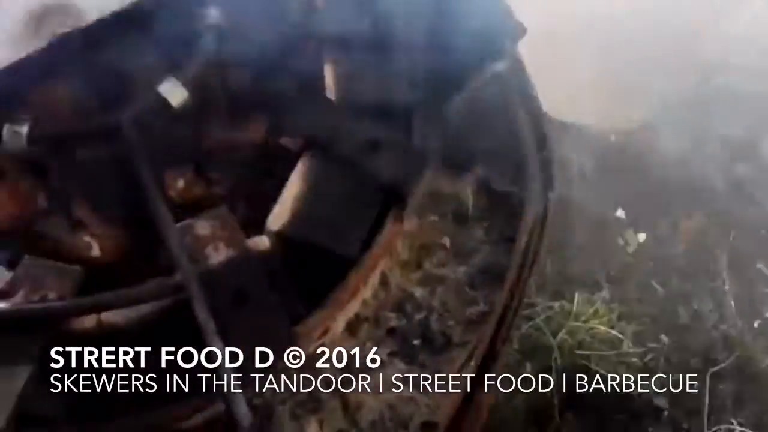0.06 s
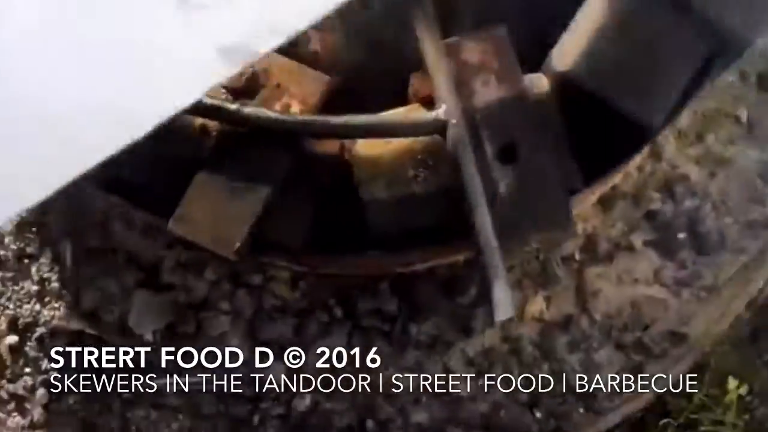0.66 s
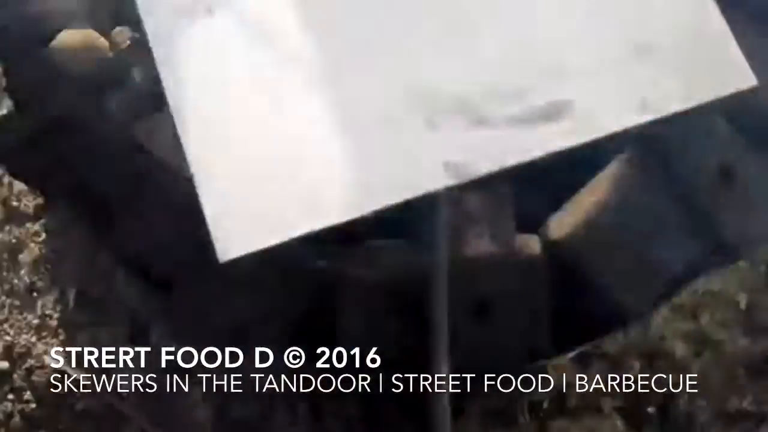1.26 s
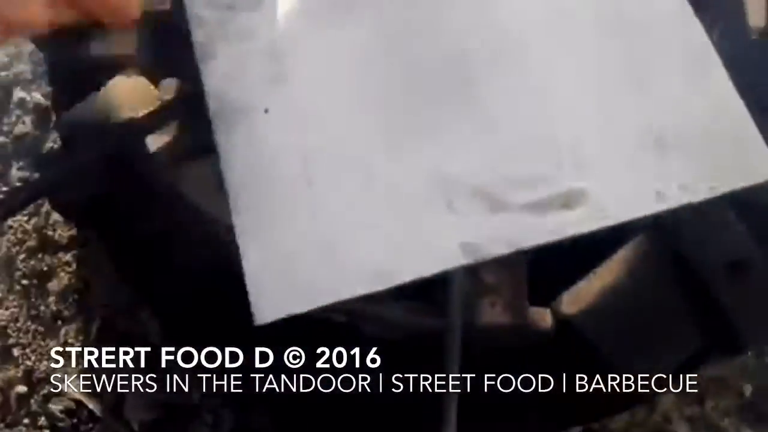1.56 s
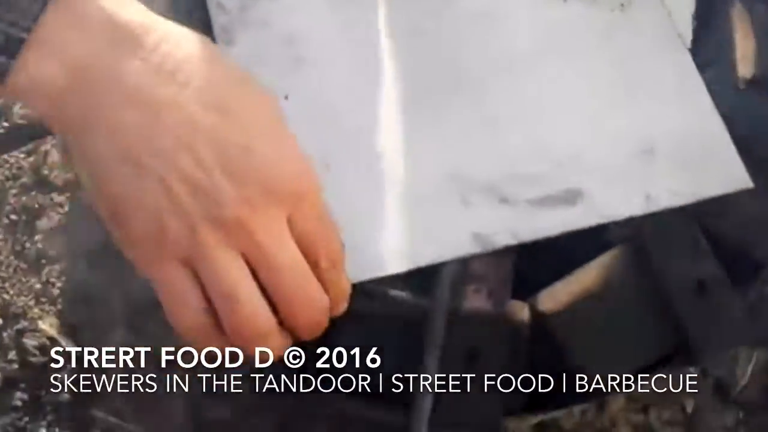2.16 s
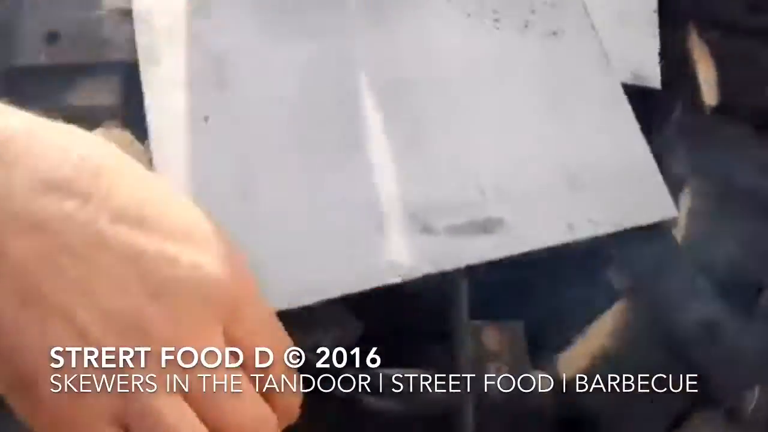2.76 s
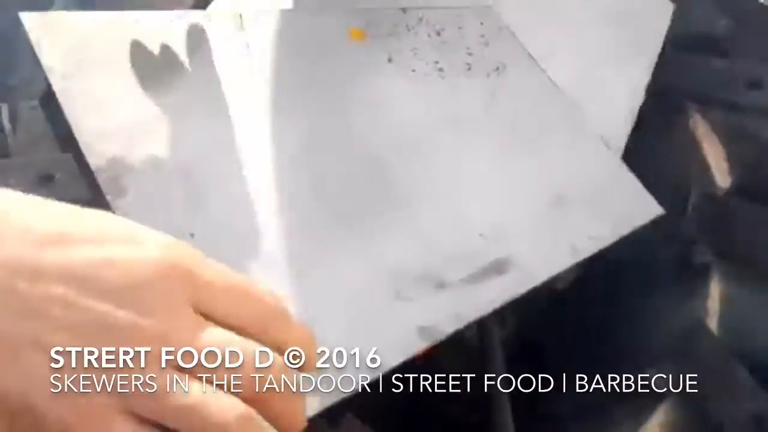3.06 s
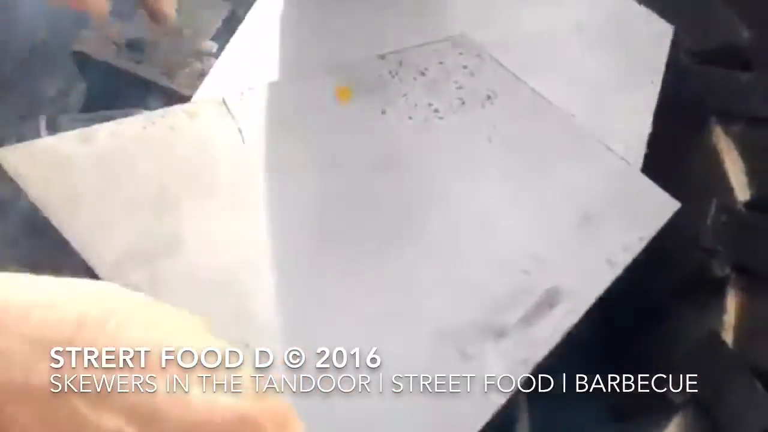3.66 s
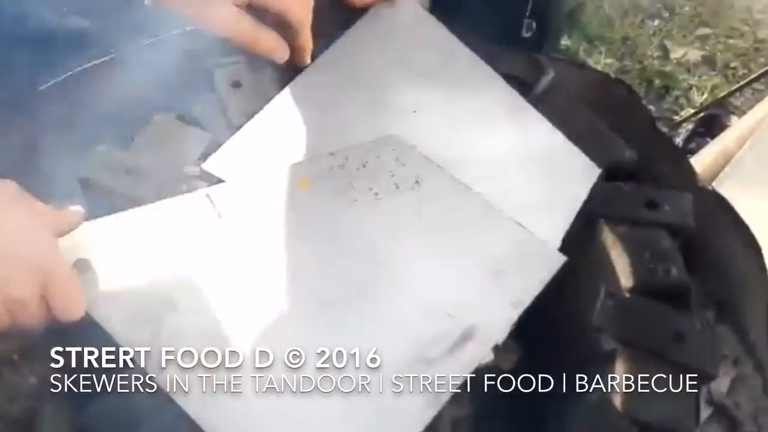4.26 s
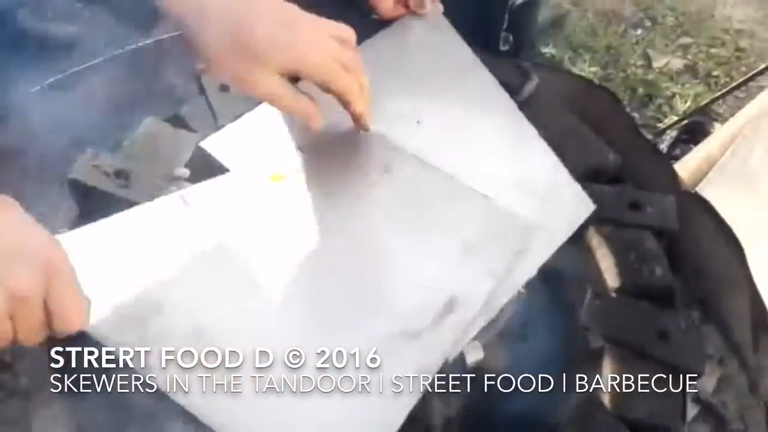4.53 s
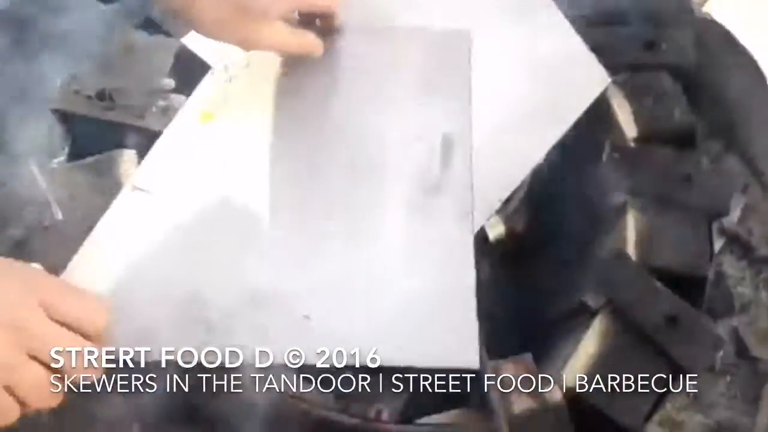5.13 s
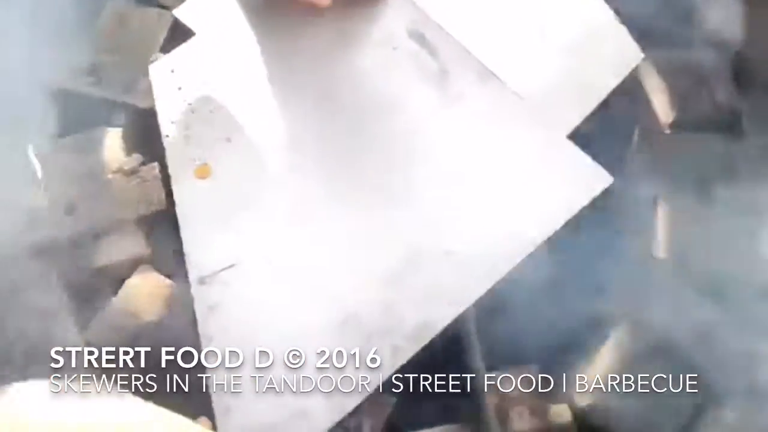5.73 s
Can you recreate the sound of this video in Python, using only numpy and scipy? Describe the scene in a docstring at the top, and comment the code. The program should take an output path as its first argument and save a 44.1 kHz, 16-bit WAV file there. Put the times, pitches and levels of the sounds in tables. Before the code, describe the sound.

Wind rumbles and buffets a nearby microphone outdoors while someone handles thin metal sheets. Sharp, high clinks and short scratches lead to a single bright crash with a brief rattle as a sheet lands on the stack. Then metal slides over metal in irregular, gritty, slightly ringing scrapes, strongest around the middle, before thinning to soft rubs and light taps under the gusts.

```python
"""At an outdoor oven, thin metal sheets are laid over the mouth and pushed into place.
They clink and crash down once: each impact excites dense bending modes, which decay exponentially.
Sliding over each other they scrape, as stick-slip friction drives the same kind of modes.
Turbulent wind rumbles, buffets and thumps on the microphone, which overloads on the crash."""
import sys
import numpy as np
from scipy import signal
from scipy.fft import rfft, irfft, next_fast_len
from scipy.io import wavfile
from scipy.ndimage import uniform_filter1d, map_coordinates

SR = 44100
rng = np.random.default_rng(int(sys.argv[2]) if len(sys.argv) > 2 else 0)


def master_out(mix):
    """Clip the mix to full scale and print it as 16-bit PCM to the path in sys.argv[1]."""
    frames = np.transpose(np.atleast_2d(mix))
    ceiling = np.clip(frames, -1, 1)
    pcm = np.round(ceiling * 32767).astype(np.int16)
    wavfile.write(sys.argv[1], SR, pcm)


N = 264254
TIME = np.arange(N) / SR
LANDING_S = 1.4  # the loose sheet drops onto the stack

# contacts of the sheets: start_s, level_db, centre_hz, t60_s
CONTACTS = [(0.1101, -9.5, 6530, 0.29), (0.278, -26.5, 5100, 0.25), (0.636, -15, 6600, 0.017),
            (0.776, -26.5, 9200, 0.15), (0.81, -33.5, 1630, 0.77), (0.859, -21, 6100, 0.31),
            (0.871, -9.5, 7250, 0.15), (0.908, -10, 7560, 0.21), (1.096, -32, 1570, 0.5),
            (1.175, -18.5, 6080, 0.12), (1.396, -22, 5200, 0.22), (1.406, -0.5, 5300, 0.39),
            (1.452, -0.5, 10000, 0.047), (1.481, -6.5, 9100, 0.18), (1.5677, -14.5, 5860, 0.27),
            (1.61, -17.5, 6300, 0.15), (1.725, -53, 3140, 0.12), (2.04, -28, 8120, 0.046),
            (3.104, -16.5, 7670, 0.15), (3.3108, -26, 11200, 0.012), (3.326, -32, 6460, 0.29),
            (3.5026, -30, 5000, 0.13), (3.568, -25.5, 5160, 0.13), (4.216, -29.5, 1500, 0.035),
            (4.4506, -30, 10000, 0.022), (4.4978, -36.5, 6670, 0.041), (4.6803, -25, 4850, 0.039),
            (4.88, -44.5, 1670, 0.14), (5.153, -43.5, 4030, 0.062), (5.733, -46.5, 6100, 0.024)]
# strongest modes of the top sheet: pitch_hz, level_db
STRONG_MODES = [(2606, -8.5), (3473, -4.5), (3915, 2.5), (4353, -3)]
# spectral envelope of an impact: frequency_hz, level_db
IMPACT_SPECTRUM = [(250, -35), (600, -19.5), (1200, -11), (2200, -1.5), (3500, -1), (4500, -7.5),
                   (9500, -4.5), (14000, -5)]

def clinks(spacing_hz=14, chatter_per_s=600, chatter_db=-3, flat_s=1.662, settle_s=0.033):
    """Impact excitation: an edge strikes, then chatters on the other sheet while the modes decay."""
    out, hz, t = np.zeros(N), bins(SR), TIME[:SR]
    modes = plate_modes(spacing_hz)
    for start, db, centre_hz, t60 in CONTACTS:
        held = start < LANDING_S
        focus_db = 17 if held else 9  # a free sheet touches at one corner and rings more narrowly
        focus = lambda f: gain_of(focus_db * (bell(f + 1, centre_hz, octaves=.5) - 2.5))
        struck = modes * read(IMPACT_SPECTRUM, hz) * focus(hz)
        if held:  # in the air, its low modes ring too
            struck *= gain_of(7 * bell(hz + 1, 800, octaves=.5))
        fade = decay(t, t60)
        body = plate_ring(struck, t60)
        for mode_hz, mode_db in STRONG_MODES:
            tone = np.sin(2 * np.pi * (mode_hz * t + rng.random()))
            body += gain_of(mode_db - 16) * focus(mode_hz) * fade * tone
        taps = rng.standard_normal(SR) * (rng.random(SR) < chatter_per_s / SR) * fade
        taps[0] = 1
        chatter = signal.fftconvolve(taps, plate_ring(struck, t60=0.074))[:SR]
        clink = body + gain_of(chatter_db) * np.std(body) * unit_rms(chatter)
        if start < flat_s:  # the dropped sheet comes to lie flat, which chokes its ring
            clink *= np.exp(-np.maximum(start + t - flat_s, 0) / settle_s)
        add(out, start, gain_of(db) * clink)
    return out

def plate_modes(spacing_hz):
    """Constant modal density: a thin plate's modes fall at random, as amplitudes on a 1 Hz grid."""
    size = SR // 2 + 1
    return (rng.random(size) < 1 / spacing_hz) * rng.rayleigh(1, size)

def plate_ring(modes, t60, treble_damping=0.37, ripple_db=0.0):
    """Modal superposition: a 1 s impulse response; t60 holds at 4 kHz, treble_damping tilts it."""
    ripple = unit_rms(uniform_filter1d(rng.standard_normal(len(modes)), size=200))
    weights = modes * gain_of(ripple_db * ripple)  # neighbouring modes swell together
    spectrum = weights * np.exp(2j * np.pi * rng.random(len(modes)))
    spectrum /= np.std(irfft(spectrum, SR))
    octave = np.log2(np.clip(bins(SR), 500, 16000) / 500)
    out = np.zeros(SR)
    for k in range(6):
        band = irfft(spectrum * np.maximum(1 - abs(octave - k), 0), SR)
        out += band * decay(TIME[:SR], t60 / 2 ** (treble_damping * (k - 3)))
    return out

# tones of a sheet left free: start_s, pitch_hz, level_db, t60_s
LONG_TONES = [(0.638, 1071, -43, 0.5), (0.636, 538, -43, 0.55), (1.406, 1599, -27.5, 1.35),
              (1.406, 570, -35, .8), (5.228, 3340, -37, 0.15)]

def singing(hand_s=.54):
    """Free vibration: lightly damped modes outlast the blow, until a hand comes down on the sheet."""
    out, t = np.zeros(N), TIME[:SR]
    muting = rolloff(t, hand_s, order=12)
    for start, hz, db, t60 in LONG_TONES:
        add(out, start, gain_of(db) * decay(t, t60) * muting * np.sin(2 * np.pi * hz * t))
    return out

# spectral envelope of sliding: frequency_hz, level_db
SCRAPE_SPECTRUM = [(250, -40.5), (600, -19), (1400, -3), (2300, -4), (3600, -2.5), (10300, -5.5),
                   (14000, -13)]

def scraping(level_db=-0.5, catches_per_s=2200, grit_db=-7):
    """Stick-slip friction: tiny catches of the edge sound as dry grit and as the ring of the stack."""
    catches = rng.choice([-1, 1], N) * (rng.random(N) < catches_per_s / SR)
    catches = catches * gain_of(4.5 * np.minimum(rng.exponential(1, N), 3.5))
    flicker_db = np.where(TIME < LANDING_S, 1, 2.3) * flutter(N, rate_hz=50)
    catches *= gain_of(flicker_db)
    grit = unit_rms(shaped(catches, lambda hz: read(SCRAPE_SPECTRUM, hz)))
    rub = unit_rms(unit_rms(stack_ring(catches)) + gain_of(grit_db) * grit)
    return gain_of(level_db) * friction() * free_span(rub)

def stack_ring(catches, flex=.012):
    """Forced vibration: new modes take over as the overlap shifts, and flexing bends their pitch."""
    hop, out = SR // 7, np.zeros(N)
    for start in range(-hop, N, hop):
        first = max(start, 0)
        stretch = catches[first:start + 2 * hop]
        window = np.sin(np.pi * (np.arange(len(stretch)) + first - start) / (2 * hop))
        modes = plate_modes(spacing_hz=26) * read(SCRAPE_SPECTRUM, bins(SR))
        plate = plate_ring(modes, t60=.12, treble_damping=0, ripple_db=2.1)
        add(out, first / SR, signal.fftconvolve(stretch * window, unit_rms(plate[:hop])))
    sway = np.sin(2 * np.pi * (2 * TIME + rng.random()))
    sway += np.sin(2 * np.pi * (np.pi * TIME + rng.random())) / 2
    warped_index = np.arange(N) + flex * SR / (4 * np.pi) * sway
    return map_coordinates(out, [warped_index], order=3)

# pushes of sheet over sheet: start_s, length_s, level_db, lean_db (change from start to end)
HAND_PUSHES = [(-0.02, 0.2, -36, -16), (0.358, 0.21, -31.5, -1.5), (0.642, 0.1, -44.5, 8.5),
               (0.794, 0.4, -33, -5), (1.257, 0.13, -45, 19), (1.917, 0.15, -41.5, 12),
               (2.154, 0.31, -50, -2.5), (2.67, 0.55, -36, 18.5), (3.326, 0.38, -44.5, 3),
               (4.099, 0.28, -42.5, 7), (4.411, 0.32, -48, 1.5), (4.868, 0.48, -57, 3.5),
               (5.216, .17, -40, 0), (5.423, 0.2, -52.5, -7), (5.908, 0.1, -53.5, 1.5)]
# the edge digs in and scratches: peak_s, level_db
EDGE_SNAGS = [(0.19, -19.5), (0.307, -21.5), (0.582, -27), (0.947, -21.5), (1.216, -24), (2.866, -24.5),
              (2.971, -27), (3.16, -24), (3.475, -36), (4.3, -32), (5.061, -49), (5.357, -32)]

def friction(snag_rise_s=0.021, snag_fall_s=0.032):
    """Friction follows load: the hand leans in or eases off in each push, and snags flare briefly."""
    power = np.zeros(N)
    for start, length, db, lean_db in HAND_PUSHES:
        progress = np.clip((TIME - start) / length, 0, 1)
        push = envelope(start, length, attack_s=0.016, release_s=0.036)
        power += (gain_of(db + lean_db * (progress - .5)) * push) ** 2
    for peak_s, db in EDGE_SNAGS:
        away = np.maximum((peak_s - TIME) / snag_rise_s, (TIME - peak_s) / snag_fall_s)
        power += (gain_of(db) * np.exp(-np.minimum(away, 20))) ** 2
    return np.sqrt(power)

# resonance of the free span beside the sliding edge: time_s, pitch_hz, freedom (0-1)
SPAN_RESONANCE = [(0, 6400, 0.71), (.22, 8550, 0.21), (.45, 9700, 0.34), (.7, 9150, 0.25), (1.7, 2060, 0),
                  (1.951, 2244, 0.74), (2.26, 2580, 0.47), (2.379, 2000, 0.65), (2.55, 1850, 0.93),
                  (2.8, 1996, 0.25), (3.15, 1670, 0.37), (3.75, 1565, 0.3), (4.1, 4250, 0.6),
                  (4.19, 3850, 0.4), (4.32, 3300, 0.2), (5.25, 3380, 0)]

def free_span(rub, peak_db=16, cut_db=-20, width_octaves=.06, overtone_ratio=2.15):
    """Resonance: two modes glide as the span changes length; it radiates little below the lower one."""
    hz, t, spectra = signal.stft(rub, SR, nperseg=1024)
    hz = hz[:, None] + 1
    times, *columns = np.transpose(SPAN_RESONANCE)
    span_hz, freedom = (np.interp(t, times, column) for column in columns)
    overtone = .4 * bell(hz, overtone_ratio * span_hz, width_octaves) * rolloff(hz, 6000, order=4)
    peaks = bell(hz, span_hz, width_octaves) + overtone
    lows = rolloff(hz, .8 * span_hz, order=20)
    gain = gain_of(peak_db * freedom * peaks + cut_db * freedom ** 2 * lows)
    colour = read(SCRAPE_SPECTRUM, hz)
    gain /= np.linalg.norm(gain * colour, axis=0) / np.linalg.norm(colour)  # power stays constant
    return signal.istft(spectra * gain, SR)[1][:N]

# spectral envelope of turbulence: frequency_hz, level_db
WIND_SPECTRUM = [(12, -36), (25, 6), (60, 3.5), (150, -2), (290, -11), (500, -25.5), (900, -33.5),
                 (1800, -58.5)]

def wind(level_db=-1, deep_exponent=0.87, flap_exponent=1.33, flap_db=5, split_hz=170):
    """Turbulence at the microphone: a rumble whose upper part flaps and grows faster with each gust."""
    strength_db = wind_strength_db()
    mean_db = strength_db.mean()
    rise = gain_of(strength_db - mean_db)
    rumble = unit_rms(shaped(rng.standard_normal(N), lambda hz: read(WIND_SPECTRUM, hz)))
    deep = shaped(rumble, lambda hz: rolloff(hz, split_hz, order=2) ** 2)
    eddies = np.clip(flutter(N, rate_hz=21), -2, 2)
    flaps = (rumble - deep) * unit_rms(gain_of(flap_db * eddies))
    deep *= unit_rms(gain_of(flap_db / 2 * eddies))
    return gain_of(mean_db + level_db) * (deep * rise ** deep_exponent + flaps * rise ** flap_exponent)

# breeze between gusts: time_s, strength_db
LIGHT_BREEZE = [(0, -33.5), (1.2, -30.5), (1.7, -35.5), (2.35, -41), (3.3, -39), (3.9, -53.5),
                (4.55, -58.5), (5.0, -39.5), (5.99, -43.5)]
# gusts: start_s, length_s, strength_db
WIND_GUSTS = [(0.141, .15, -19.5), (0.379, 0.24, -23), (0.595, 0.059, -33), (1.155, 0.09, -23),
              (1.327, .12, -18.5), (1.757, .18, -26), (2.071, 0.18, -25.5), (2.492, .39, -25),
              (2.99, 0.11, -27.5), (3.196, .39, -28), (3.604, 0.11, -31), (3.971, .12, -41),
              (4.158, 0.054, -35.5), (4.297, 0.12, -40), (4.702, .18, -32), (5.278, 0.13, -30.5),
              (5.668, 0.032, -30.5), (5.798, .2, -27)]

def wind_strength_db():
    """Incoherent addition: the gusts and the breeze sum in power."""
    power = gain_of(np.interp(TIME, *np.transpose(LIGHT_BREEZE))) ** 2
    for start, length, db in WIND_GUSTS:
        power += (gain_of(db) * envelope(start, length, attack_s=0.0053, release_s=.03)) ** 2
    return 10 * np.log10(power)

# eddies that hit the microphone port: time_s, level_db, length_s
EDDIES = [(0.239, -10.5, 0.0031), (0.321, -28, 0.037), (0.519, -34.5, 0.044), (1.787, -32, 0.042),
          (1.825, -29.5, 0.0092), (1.934, -31.5, 0.013), (2.085, -36, 0.025), (2.23, -35, 0.018),
          (2.509, -27, 0.01), (2.564, -32, 0.014), (2.58, -25, 0.033), (2.636, -22.5, 0.022),
          (2.675, -24, 0.022), (2.811, -17, 0.0093), (3.394, -30.5, 0.03), (3.453, -25.5, 0.011),
          (4.327, -38, 0.015), (4.764, -32, 0.013), (4.992, -41.5, 0.019), (5.341, -30, 0.0064),
          (5.382, -32.5, 0.0071), (5.802, -32, 0.014), (5.883, -24.5, 0.034)]

def buffets(level_db=-3, full_speed_db=-31.5):
    """Pressure fluctuation: an eddy tears at the port in a dull, ragged puff."""
    out, size = np.zeros(N), 8192
    for time_s, db, length in EDDIES:
        swell = pulse(TIME[:size], peak_s=length / 2)
        puff = rng.standard_normal(size) * gain_of(3 * flutter(size, rate_hz=200)) * swell
        speed = min(gain_of(db - full_speed_db), 1)  # weak eddies are slower, so duller
        dulling = lambda hz: rolloff(hz, 400 * speed, order=1) * rolloff(hz, 1500 * speed, order=6)
        puff = shaped(puff, lambda hz: dulling(hz) * (1 - rolloff(hz, 110, order=2)))
        swell_rms = np.sqrt(np.mean(swell ** 2))
        add(out, time_s - .002, gain_of(db + level_db) * swell_rms * unit_rms(puff))
    return out

# jolts of air at the port: start_s, peak_db, pitch_hz
AIR_JOLTS = [(0.12, -7, 165), (0.47, -13, 128), (0.52, -12.5, 210), (0.537, -14, 270), (1.339, -15, 108),
             (2.836, -17.5, 133)]

def thumps(rise_cycles=.9, pitch_jitter=0.061):
    """Pressure transient: a jolt of air gives a few uneven low cycles that swell and die."""
    out, t = np.zeros(N), TIME[:SR // 10]
    for start, db, hz in AIR_JOLTS:
        cycles = np.cumsum(hz * (1 + pitch_jitter * flutter(len(t), hz))) / SR
        add(out, start, gain_of(db) * pulse(t, rise_cycles / hz) * np.sin(2 * np.pi * cycles))
    return out

# spectral envelope of the background: frequency_hz, level_db
AIR_SPECTRUM = [(500, -14.5), (6000, -16), (14000, -18.5)]

def air(level_db=-67.5):
    """Broadband ambient noise: a faint outdoor hiss."""
    return gain_of(level_db) * unit_rms(shaped(rng.standard_normal(N), lambda hz: read(AIR_SPECTRUM, hz)))

def gain_of(db):
    """Decibels to amplitude."""
    return 10 ** (np.asarray(db) / 20)

def unit_rms(x):
    """Normalisation to rms 1."""
    return x / np.sqrt(np.mean(x ** 2) + 1e-20)

def read(spectrum, hz):
    """Gain of a spectral envelope, interpolated in log frequency."""
    points_hz, db = np.transpose(spectrum)
    return gain_of(np.interp(np.log(hz + 1), np.log(points_hz + 1), db))

def bins(size):
    """Fourier frequencies for that many samples."""
    return np.fft.rfftfreq(size, 1 / SR)

def shaped(x, gain):
    """Zero-phase filtering by a function of frequency."""
    size = next_fast_len(len(x))
    return irfft(rfft(x, size) * gain(bins(size)), size)[:len(x)]

def rolloff(x, edge, order):
    """Low-pass curve: flat below the edge, a power law above."""
    return 1 / np.sqrt(1 + (x / edge) ** (2 * order))

def bell(hz, centre_hz, octaves):
    """Bell curve in log frequency."""
    return np.exp(-.5 * (np.log2(hz / centre_hz) / octaves) ** 2)

def flutter(size, rate_hz):
    """Low-pass random modulation of rms 1."""
    return unit_rms(shaped(rng.standard_normal(size), lambda hz: rolloff(hz, rate_hz, order=2)))

def decay(t, t60):
    """Exponential decay, 60 dB in t60 seconds."""
    return np.exp(-np.log(1000) * t / t60)

def pulse(t, peak_s):
    """Smooth swell to 1, then decay."""
    return (t / peak_s * np.exp(1 - t / peak_s)) ** 2

def envelope(start, length, attack_s, release_s):
    """Linear attack, hold, exponential release."""
    attack = np.clip((TIME - start) / attack_s, 0, 1)
    return attack * np.exp(-np.maximum(TIME - start - length, 0) / release_s)

def add(mix, start_s, sound):
    """Superposes a sound on the mix."""
    part = mix[max(round(start_s * SR), 0):][:len(sound)]
    part += sound[:len(part)]

def scene(side_db=-9, side_hz=7500):
    """Mid-side stereo: all is central but a decorrelated treble band of the sheets."""
    metal = clinks() + scraping() + singing()
    scatter = rng.standard_normal(512) * np.hanning(512)
    diffuse = signal.oaconvolve(metal, scatter / np.linalg.norm(scatter))[:N]
    side = shaped(diffuse, lambda hz: bell(hz + 1, side_hz, octaves=0.29))
    return metal + wind() + buffets() + thumps() + air() + gain_of(side_db) * np.array([side, -side])

def record(dry, edge_hz=14280):
    """Soft saturation: the microphone overloads on the hardest blows; a low-pass limits the band."""
    saturated = dry / (1 + dry ** 4) ** (1 / 4)
    low_pass = signal.firwin(401, edge_hz, window=("kaiser", 8), fs=SR)
    return signal.oaconvolve(saturated, low_pass[None], "same")

dry = scene()
out = record(dry)
master_out(out)
```